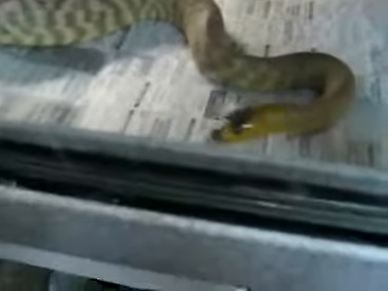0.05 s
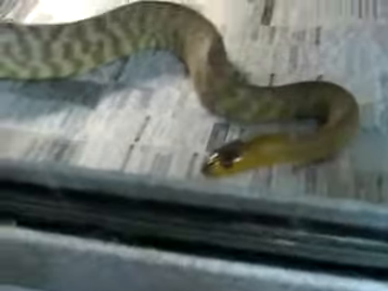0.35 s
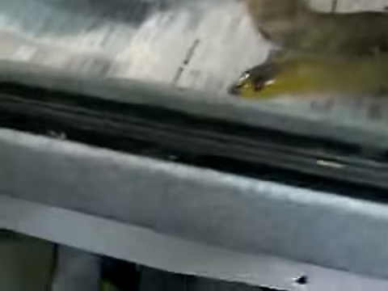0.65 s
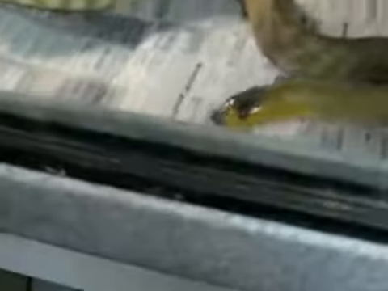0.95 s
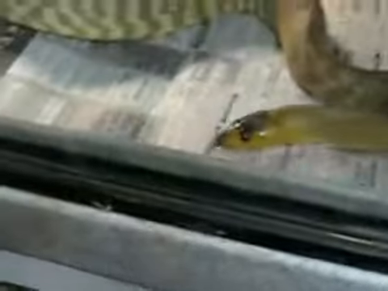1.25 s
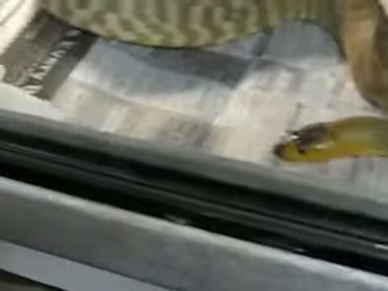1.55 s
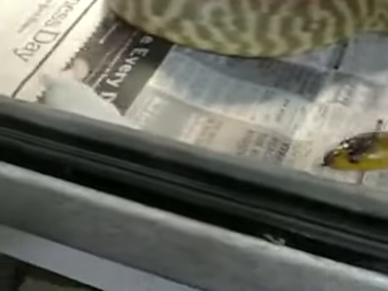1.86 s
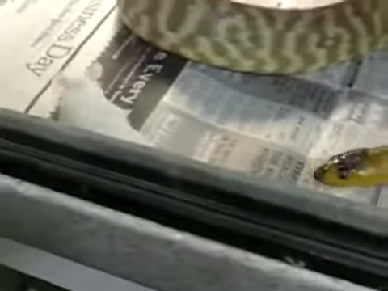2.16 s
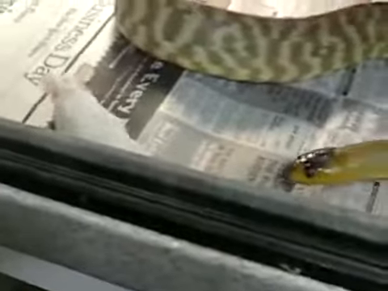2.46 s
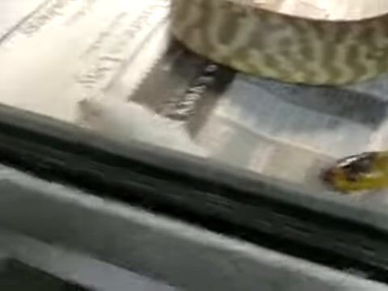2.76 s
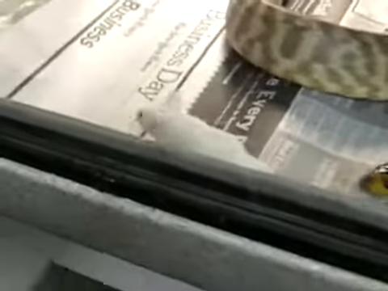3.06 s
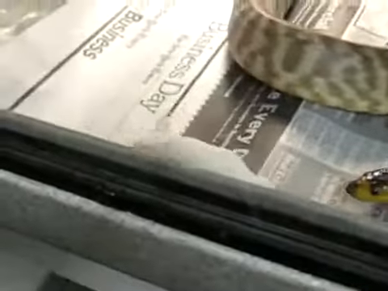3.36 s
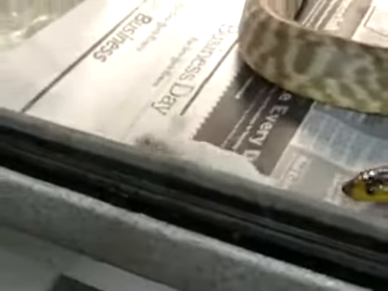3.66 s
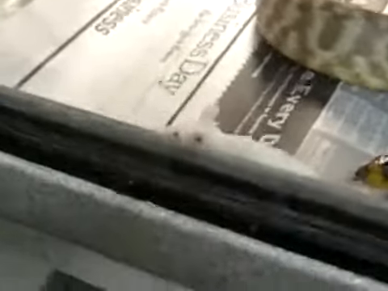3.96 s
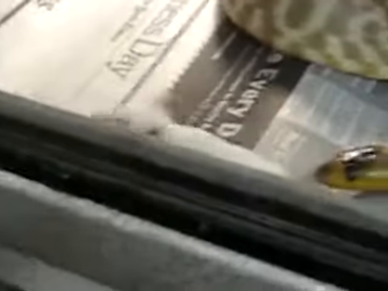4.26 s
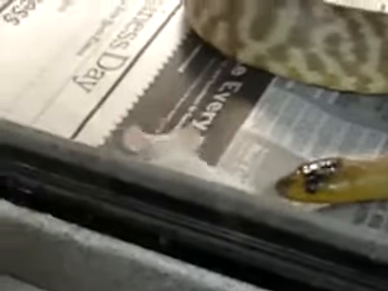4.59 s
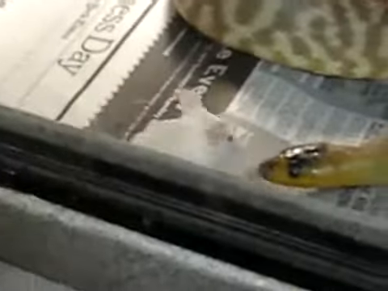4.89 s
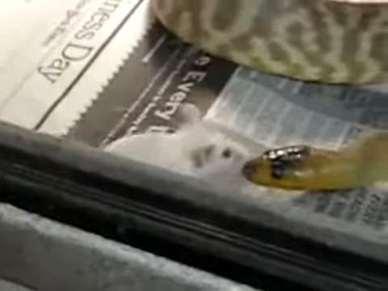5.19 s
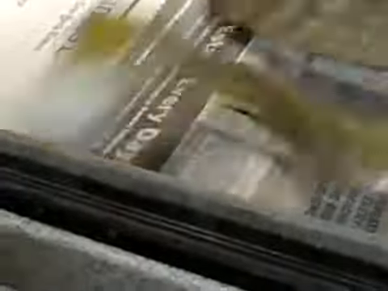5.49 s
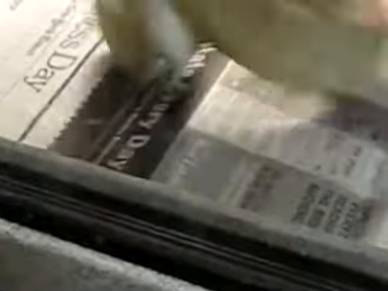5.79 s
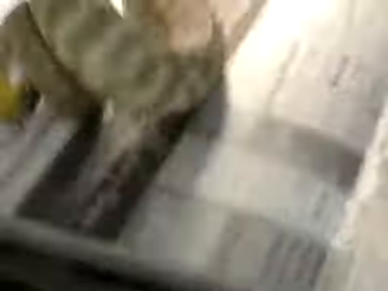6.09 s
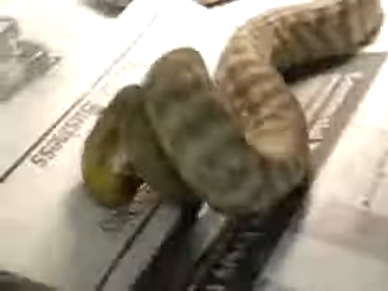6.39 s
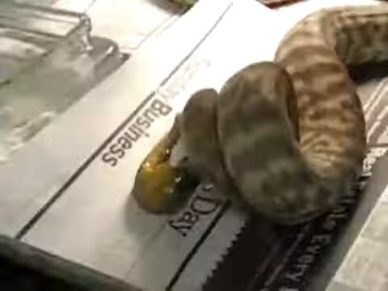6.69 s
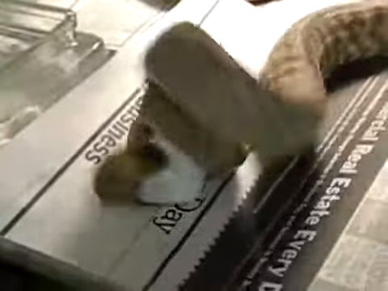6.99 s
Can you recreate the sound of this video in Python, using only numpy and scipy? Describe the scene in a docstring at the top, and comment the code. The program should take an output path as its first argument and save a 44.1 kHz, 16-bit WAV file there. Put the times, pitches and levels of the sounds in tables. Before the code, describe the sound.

Over a humming fan, sharp plastic clicks sound close up, then a snake strikes with dull thumps and newspaper rustling.

```python
"""A snake strikes a mouse

A fan hums in the room while a snake slides over newspaper, its scales sticking and slipping.
It strikes a mouse and coils round it; thumps and scuffles excite the modes of the enclosure floor.
The casing of a hand-held camera clicks right at the microphone, and each hard click makes the
gain control duck the room, which then swells back."""
import sys
import numpy as np
from scipy import signal
from scipy.fft import rfft, irfft, next_fast_len
from scipy.io import wavfile
from scipy.ndimage import uniform_filter1d, map_coordinates

SR = 44100
rng = np.random.default_rng(int(sys.argv[2]) if len(sys.argv) > 2 else 0)


def unload_audio(sound):
    """Save the sound as a 16-bit wav file, at the path given as the first command line argument."""
    columns = np.transpose(np.atleast_2d(sound))
    # keep every value between -1 and 1, then stretch to whole-number steps
    steps = np.round(np.clip(columns, -1, 1) * 32767)
    wavfile.write(sys.argv[1], SR, steps.astype(np.int16))


N = 314874

# Air rushing through the fan. Each row: frequency in Hz, relative spectral density in dB.
AIR_SPECTRUM = [(20, -25.5), (45, -12), (100, -10.5), (140, -7), (260, -3.5), (330, 1), (425, -6),
                (530, -3.5), (740, -6), (950, -13), (1350, -18), (2000, -22), (3500, -24.5), (5500, -37.5)]
# The room's resonances. Each row: centre in Hz, width in Hz, boost in dB.
ROOM_MODES = [(80.2, 8, 13.5), (163.1, 18, 8), (220, 19, 3), (294.3, 18, 8), (338.4, 33, 4), (529.3, 23, 6),
              (803, 42, 4.5)]
# The hum's slow swell. Each row: time in seconds, rms level in dB.
HUM_LEVELS = [(0, -31.5), (.2, -28), (.45, -34), (.7, -26), (1.15, -32), (1.4, -27), (1.72, -32.5),
              (2, -25.5), (2.22, -29), (2.6, -28), (3.25, -29), (3.5, -31), (4.35, -31), (4.8, -32),
              (5.1, -28), (5.85, -32), (6.5, -29), (6.95, -28)]
# The fan's overtones. Each row: frequency in Hz, relative level in dB.
FAN_OVERTONES = [(113.0, -39), (172.3, -43.5), (226.1, -42), (306.8, -38), (398.4, -43), (457.6, -42.5),
                 (489.9, -40.5), (527.6, -43), (640.6, -42), (759.0, -39.5), (1050, -49), (1287, -48),
                 (1400, -47)]
# Scrapes on the newspaper. Each row: start in seconds, level in dB, pitch of the crease in Hz,
# rise and fade times in seconds.
PAPER_SCRAPES = [(.014, -20, 2130, 0.0051, .02), (0.384, -19.5, 2120, .025, 0.024),
                 (1.827, -22.5, 2830, 0.001, 0.021), (3.749, -23.5, 2290, 0.00055, .03),
                 (4.068, -17, 2150, .005, 0.015), (5.357, -29.5, 2980, 0.011, 0.045),
                 (5.393, -16.5, 2236, .001, 0.028), (5.412, -24.5, 2380, 0.0039, 0.032),
                 (5.425, -25, 3660, .002, .012), (5.437, -23, 3900, .0006, 0.0071),
                 (5.46, -13.5, 2350, .0005, 0.014), (5.477, -20.5, 1940, .001, 0.027),
                 (5.499, -23.5, 3090, 0.0026, 0.056), (5.592, -25, 2330, .001, 0.013),
                 (5.647, -23.5, 2244, 0.0026, 0.058), (5.745, -20.5, 3435, 0.00055, 0.018),
                 (5.758, -29.5, 2436, 0.0046, 0.019), (5.8, -24.5, 3270, 0.001, 0.026),
                 (5.947, -25.5, 2100, 0.00083, 0.056), (5.98, -21, 2900, .0006, 0.019),
                 (6.52, -31.5, 2110, 0.026, 0.12), (6.739, -39.5, 2184, 0.028, 0.21),
                 (7.102, -27.5, 2410, .001, 0.059)]
# The rubbed sheet. Each row: frequency in Hz, relative spectral density in dB.
PAPER_SPECTRUM = [(200, -15.5), (600, -9), (1400, -5), (2400, -8), (3400, -10), (4500, -16.5), (6000, -27),
                  (7500, -12.5)]
# Snaps of the casing. Each row: start in seconds, level in dB, sharp edge in dB, hollow knock in dB,
# slip time in seconds, favoured pitch in Hz, share of the free shell's ring time,
# after-ring frequency in Hz, after-ring level in dB.
CASING_CLICKS = [(0.5074, -3.5, 9, 1.5, 0.0013, 1210, 0.97, 2450, -32.5),
                 (.518, -15, 8.5, -13, 0.025, 2290, 1, 2790, -23),
                 (0.5347, -11, -1, 1.5, 0.0015, 593, 0.89, 2780, -31),
                 (.5365, 10, 10.5, -7, 0.002, 1916, .8, 2480, -17.5),
                 (.5404, 6, 11.5, -10.5, 0.0019, 2220, 0.71, 2830, -24),
                 (.5435, 20, 13.5, -11.5, 0.0022, 2080, 0.68, 2867, -17),
                 (0.5547, -1.5, 17.5, -15.5, .001, 2220, .7, 2860, -23.5),
                 (1.1632, -14.5, -8.5, 2.5, .001, 2155, 0.86, 2460, -32.5),
                 (1.22, -10, 4.5, 6.5, 0.0018, 2130, 1.2, 2494, -20.5),
                 (2.112, -26, 2, 3.5, 0.00098, 1346, 1.2, 2490, -34),
                 (2.9349, -3, -16.5, 0.5, 0.00075, 1580, 0.8, 2470, -33.5),
                 (2.9365, -2.5, -11, 2, .002, 2110, 1.3, 2460, -25.5),
                 (3.383, -16.5, -20, 13.5, 0.0045, 702, 1, 2400, -35.5),
                 (3.395, -22.5, -17.5, 6.5, .002, 1775, 0.92, 2394, -36.5),
                 (3.404, -17.5, -22, 2.5, 0.00089, 2150, 0.77, 2454, -32.5),
                 (3.4069, -9.5, -2, 14, .0007, 1950, 0.83, 2494, -31),
                 (3.5867, -22.5, -8, -2, 0.0032, 1775, .8, 2400, -31.5),
                 (3.5921, 4, -0.5, 11, .0005, 1910, 0.99, 2406, -27),
                 (3.771, 4.5, -4.5, 9.5, 0.0011, 2320, 1, 2420, -25.5),
                 (4.059, -12.5, 6, -3.5, 0.00016, 884, 1, 2420, -31),
                 (4.12, -32, 5, 5, .0007, 1486, 1.1, 2510, -33),
                 (4.1728, -16, 2.5, -4.5, 0.0011, 1116, 0.88, 2390, -27),
                 (4.2002, -12, -1.5, -9, 0.00084, 1253, 1.2, 2515, -28.5),
                 (4.2042, -2.5, 11.5, -1.5, 0.0013, 2000, .8, 2440, -33),
                 (4.2056, 20.5, 14.5, -13.5, .0025, 2010, 0.57, 2460, -19),
                 (4.223, -1, 10.5, -10, .0005, 1200, .6, 2535, -25.5),
                 (4.296, -12, -10, -12, 0.0011, 2320, 1, 2335, -16.5),
                 (4.4183, 6, 19.5, -7, .001, 1360, 1, 2850, -19),
                 (6.417, -20, -15, 17, .001, 1950, 1, 2490, -31),
                 (7.0, -.5, -15.5, 7.5, 0.0018, 1870, 1.4, 2420, -19.5)]
# The shell's modes, the two hollow ones first. Each row: frequency in Hz, level in dB, T60 in seconds.
CASING_MODES = [(516, -5, 0.04), (611, -8, 0.034), (815, -7.5, 0.0085), (1154, -10.5, 0.032),
                (1453, -2.5, 0.025), (1612, -5, 0.021), (2060, -2, .011), (2244, -1, 0.012),
                (2476, -6.5, 0.0071), (2940, -9.5, .013), (4060, 1, 0.007)]
# The snake's body lands. Each row: start in seconds, level in dB, contact time in seconds (short for
# a slap of the skin, long for its weight), share of the free floor's ring time.
BODY_LANDINGS = [(5.399, -5.5, 0.0011, 0.18), (5.409, -10, 0.00028, .45), (5.448, -17.5, .002, 0.41),
                 (5.463, -19.5, .0002, 0.77), (5.658, -18.5, .001, 0.94), (5.7043, -8.5, 0.00016, .4),
                 (5.718, -7.5, 0.0041, 1), (5.9669, -10.5, 0.00061, .7), (5.979, -3, .003, 1),
                 (7.027, -16.5, 0.0065, .6), (7.112, -16.5, .007, 1), (7.134, -5.5, .0008, 0.82)]
# The enclosure floor's modes. Each row: frequency in Hz, level in dB, T60 in seconds.
FLOOR_MODES = [(76.4, -7.5, 0.077), (114.8, -4, 0.083), (134.2, -1.5, .14), (186.6, -2.5, .17),
               (250, -4, 0.076), (295.6, -3.5, .11), (382, -5.5, 0.067), (508, -2, .05), (696, -4, .04),
               (1120, -6.5, .016)]
# Coils and kicking feet. Each row: start in seconds, level in dB, rise and fade times in seconds.
SCUFFLE_BURSTS = [(5.408, -16, 0.0046, .075), (5.645, -25, 0.0059, 0.044), (5.76, -26.5, 0.011, .06)]
TOP_HZ = 7386


def amp(db):
    """Amplitude ratio of a level in decibels."""
    return 10 ** (np.asarray(db) / 20)


def unit(x):
    """Normalisation to an rms of 1."""
    return x / np.sqrt(np.mean(x ** 2) + 1e-20)


def running_rms(x, window_s=0.002):
    """Root of the mean square over a sliding window."""
    return np.sqrt(np.abs(uniform_filter1d(x ** 2, round(window_s * SR), mode="constant")) + 1e-12)


def spectrum_db(points, hz):
    """Interpolation of levels on a logarithmic frequency axis."""
    knots_hz, db = np.transpose(points)
    return np.interp(np.log(hz + 1), np.log(knots_hz + 1), db)


def wobble(knots_per_s):
    """Smooth random modulation: a spline through Gaussian values."""
    knots = rng.standard_normal(int(N * knots_per_s / SR) + 4)
    return map_coordinates(knots, [np.arange(N) * knots_per_s / SR])


def filtered(x, response):
    """Linear filtering: the spectrum is multiplied by a frequency response."""
    size = next_fast_len(len(x) + SR // 8)
    return irfft(rfft(x, size) * response(np.fft.rfftfreq(size, 1 / SR)), size)[:len(x)]


def passband(x, order, hz, kind):
    """A maximally flat low-, high- or band-pass filter."""
    return signal.sosfilt(signal.butter(order, hz, kind, fs=SR, output="sos"), x)


def driven(force, impulse_response):
    """Forced response of a linear system, by convolution."""
    return signal.fftconvolve(force, impulse_response)[:len(force)]


def add(track, start_s, sound):
    """Superposition of a sound on the track."""
    span = track[round(start_s * SR):][:len(sound)]
    span += sound[:len(span)]


def damped(modes, share):
    """Added damping leaves each mode only a share of its ring time."""
    return [(hz, db, t60 * share) for hz, db, t60 in modes]


def ring(modes, t, scatter_db, detune):
    """Free vibration: one decaying sine per mode, a little different at every blow."""
    hz, db, t60 = np.transpose(modes)[:, :, None]
    size, shift = rng.standard_normal((2, len(modes), 1))
    envelope = amp(db + scatter_db * size) * np.exp(-np.log(1000) * t / t60)
    return envelope * np.sin(2 * np.pi * hz * (1 + detune * shift) * t)


def fan(motor_hz=58.3, air_db=-27.5, whine_db=-4, drift_rad=0.6):
    """Rotation gives a hum and unsteady overtones; room resonances colour the noise of rushing air."""
    t = np.arange(N) / SR
    room_db = lambda hz: sum(db / (1 + (2 * (hz - centre) / width) ** 2)
                             for centre, width, db in ROOM_MODES)
    air = unit(filtered(rng.standard_normal(N), lambda hz: amp(spectrum_db(AIR_SPECTRUM, hz) + room_db(hz))))
    hum_db = np.interp(t, *np.transpose(HUM_LEVELS)) + wobble(6.6)
    hum = amp(hum_db) * np.sin(2 * np.pi * motor_hz * t + 0.15 * wobble(10))
    whine = sum(amp(db + whine_db + 3.2 * wobble(4)) * np.sin(2 * np.pi * hz * t + drift_rad * wobble(9))
                for hz, db in FAN_OVERTONES)
    return amp(air_db + 0.76 * wobble(9.3)) * air + np.sqrt(2) * (hum + whine)


def paper_scrapes(half_width_hz=280, grit_db=2.0, clump_db=0.3):
    """Stick-slip friction: scales drag in clumps of tiny slips, and each scrape excites one crease."""
    out, t = np.zeros(N), np.arange(SR // 2) / SR
    grains = rng.standard_normal(N) * amp(grit_db * wobble(1500) - clump_db * wobble(170))
    grains = np.resize(grains, N + SR)
    for start, db, pitch_hz, rise, fade in PAPER_SCRAPES:
        peak_db = 8 + 8.5 * np.log2(pitch_hz / 2200)  # a tighter, higher crease rings more
        crease_db = lambda hz: peak_db / (1 + ((hz - pitch_hz) / half_width_hz) ** 2)
        colour = lambda hz: amp(spectrum_db(PAPER_SPECTRUM, hz) + crease_db(hz))
        slips = unit(filtered(grains[round(start * SR):][:len(t)], colour))
        add(out, start, amp(db) * slips * (1 - np.exp(-t / rise)) * np.exp(-t / fade))
    return out


def casing_clicks(focus_db=8, focus_octaves=0.49, crack_db=-8, crack_decay_s=0.0025, grit=0.14):
    """Impulse excitation: plastic parts snap past each other and ring a shell damped by the hand."""
    out, t = np.zeros(N), np.arange(SR // 6) / SR
    for start, db, edge_db, knock_db, slip, pitch_hz, share, ring_hz, ring_db in CASING_CLICKS:
        snap_mode = (pitch_hz, 2, 0.004)  # the snapping part's own brief note
        after_ring = (ring_hz, ring_db, 0.12)
        modes = damped(CASING_MODES, share) + [snap_mode, after_ring]
        hollow, second_hollow, *upper = ring(modes, t, scatter_db=1.5, detune=0.015)
        shell = amp(knock_db) * (second_hollow - hollow) + sum(upper)  # hollow modes in antiphase
        shell = passband(shell, 1, 340, "high")  # little radiates below the modes
        shell = passband(shell, 4, 3540, "low")  # or above them
        crack = amp(edge_db + crack_db) * rng.standard_normal(len(t)) * np.exp(-t / crack_decay_s)
        force = grit * rng.standard_normal(len(t)) * (t / slip) * np.exp(-t / slip)
        force[0] = 1  # a tick leads the gritty slip
        # the place of the snap favours the modes near one pitch
        nearness = lambda hz: np.exp(-(np.log2((hz + 1) / pitch_hz) / focus_octaves) ** 2)
        colour = lambda hz: amp(focus_db * nearness(hz)) / (1 + (hz / TOP_HZ) ** 10)
        click = filtered(driven(force, shell + crack), colour)
        add(out, start, amp(db) * click / running_rms(click).max())
    return out


def floor_response(t, share, scatter_db, detune):
    """Modal superposition in the floor, with neighbouring modes in antiphase."""
    signs = (-1) ** np.arange(len(FLOOR_MODES))
    return signs @ ring(damped(FLOOR_MODES, share), t, scatter_db, detune)


def body_thumps(rattle=0.014, rattle_decay_s=0.035, low_cut_hz=38):
    """Impact: a longer contact excites only the low modes, and a body that stays down damps them."""
    out, t = np.zeros(N), np.arange(SR // 4) / SR
    for start, db, contact, share in BODY_LANDINGS:
        floor = floor_response(t, share, scatter_db=3.0, detune=0.012)
        blow = rattle * rng.standard_normal(len(t)) * np.exp(-t / (rattle_decay_s * share))
        blow[0] = 1  # the hit, after which the box rattles on
        force = driven(blow, np.exp(-t / contact))
        thud = passband(driven(force, floor), 2, low_cut_hz, "high")
        add(out, start, amp(db) * thud / running_rms(thud).max())
    return out


def scuffle(blows_per_s=500, ring_share=0.37, low_hz=180, high_hz=1300):
    """Random impacts: soft blows excite the middle band of a floor damped by the struggling bodies."""
    out, t = np.zeros(N), np.arange(SR // 2) / SR
    for start, db, rise, fade in SCUFFLE_BURSTS:
        floor = floor_response(t, ring_share, scatter_db=-0.5, detune=0.03)
        blows = rng.standard_normal(len(t)) * (rng.random(len(t)) < blows_per_s / SR)
        patter = passband(driven(blows, floor), 2, (low_hz, high_hz), "band")
        add(out, start, amp(db) * unit(patter) * (1 - np.exp(-t / rise)) * np.exp(-t / fade))
    return out


def scene():
    """Superposition of all sources at one microphone."""
    return (fan() + paper_scrapes() + body_thumps() + scuffle() + casing_clicks())[None]


def gain_control(x, threshold_db=-7.0, recovery_db_per_s=36, attack_s=0.0003):
    """Limiting: a burst over the threshold pulls the gain down; it climbs back at a steady rate."""
    climb_db = recovery_db_per_s * np.arange(N) / SR
    excess_db = np.maximum(20 * np.log10(running_rms(x)) - threshold_db, 0)
    cut_db = np.maximum.accumulate(excess_db + climb_db) - climb_db
    pole = np.exp(-1 / (attack_s * SR))
    return x * amp(-signal.lfilter([1 - pole], [1, -pole], cut_db))


def converter(x, decimation=3, step=1 / 52):
    """Quantisation: coarse steps hiss, and sputter with each swing of the hum when the sound is faint."""
    offset = step * (-0.33 + 0.03 * wobble(45))  # zero lies near the edge of a step
    slow = signal.resample_poly(x + offset, 1, decimation)
    coarse = np.round(slow / step) * step
    return signal.resample_poly(coarse, decimation, 1)[:N]


def record(dry, ceiling=0.87, corner_hz=5600):
    """A nonlinear chain: gain control, amplifier saturation, quantisation and a steep band limit."""
    ducked = gain_control(dry[0])
    saturated = ducked / (1 + (ducked / ceiling) ** 12) ** (1 / 12)
    band_limit = lambda hz: (hz < TOP_HZ) / np.sqrt(1 + (hz / corner_hz) ** 28)
    return filtered(converter(saturated), band_limit)[None]


dry = scene()
out = record(dry)
unload_audio(out)
```